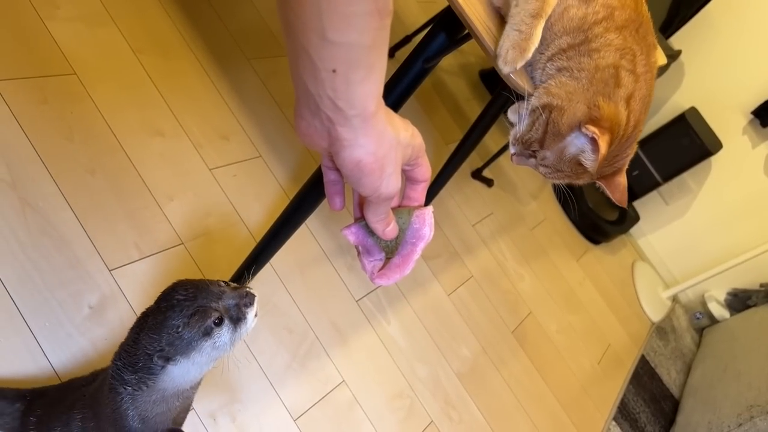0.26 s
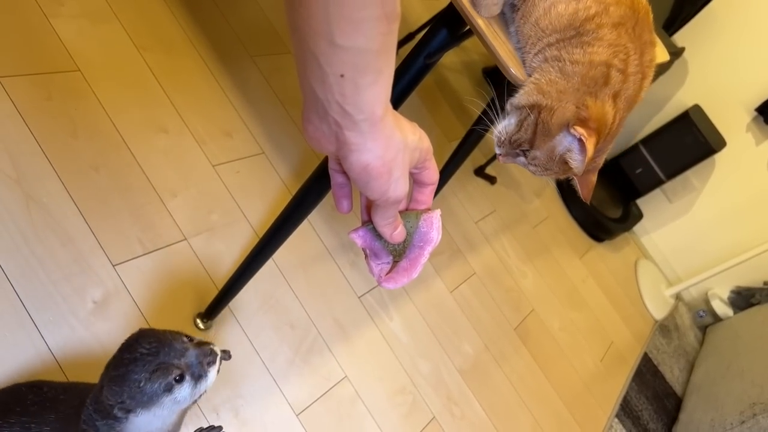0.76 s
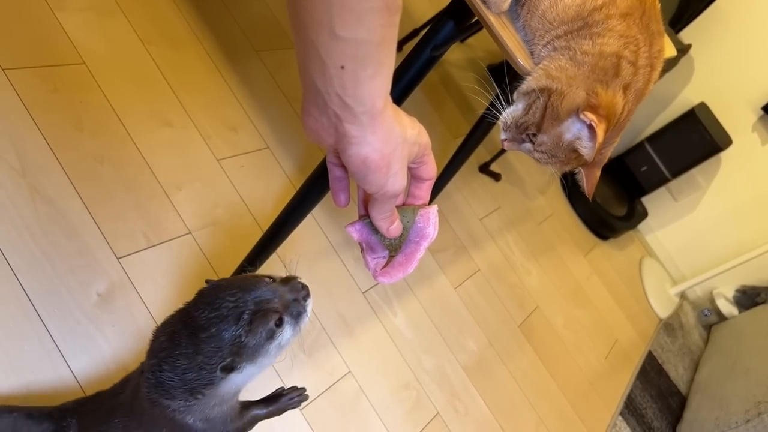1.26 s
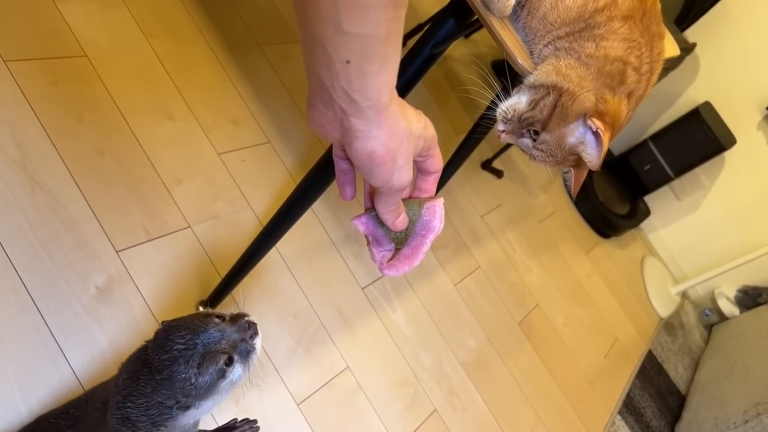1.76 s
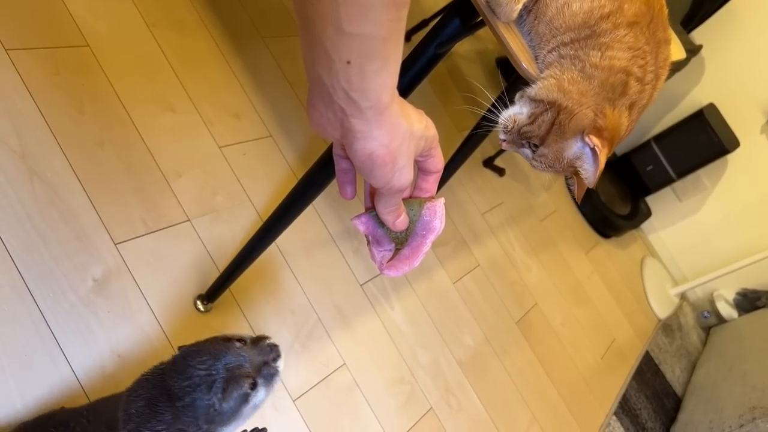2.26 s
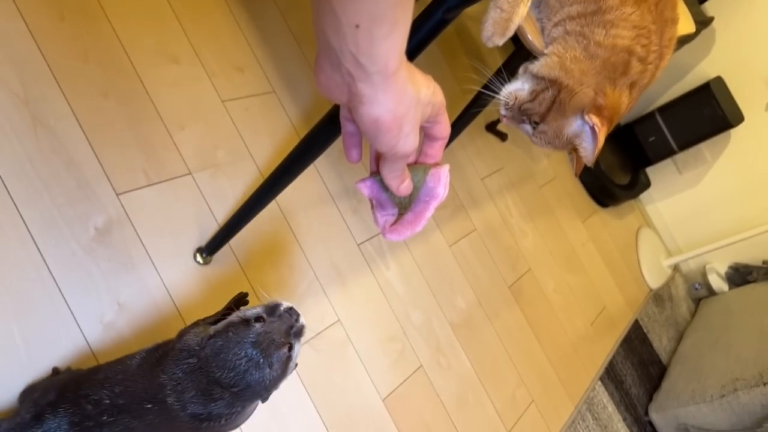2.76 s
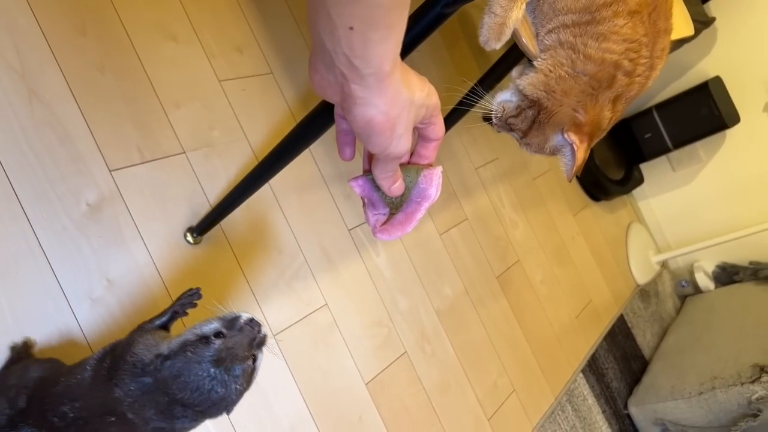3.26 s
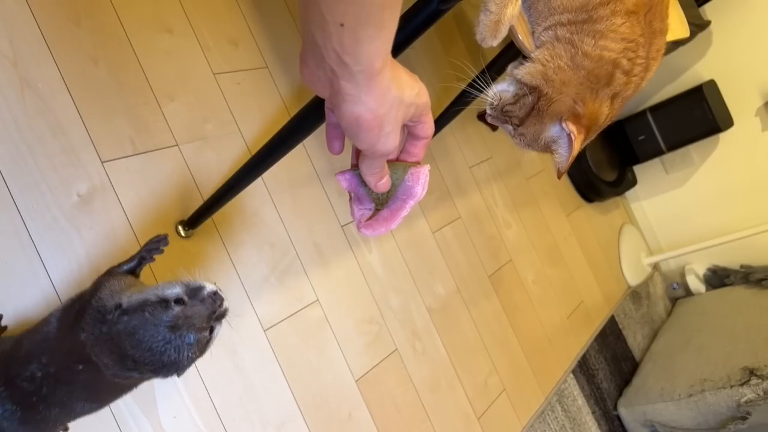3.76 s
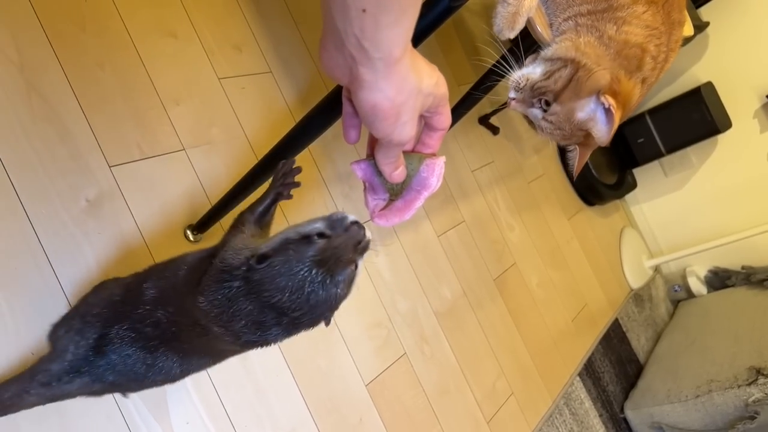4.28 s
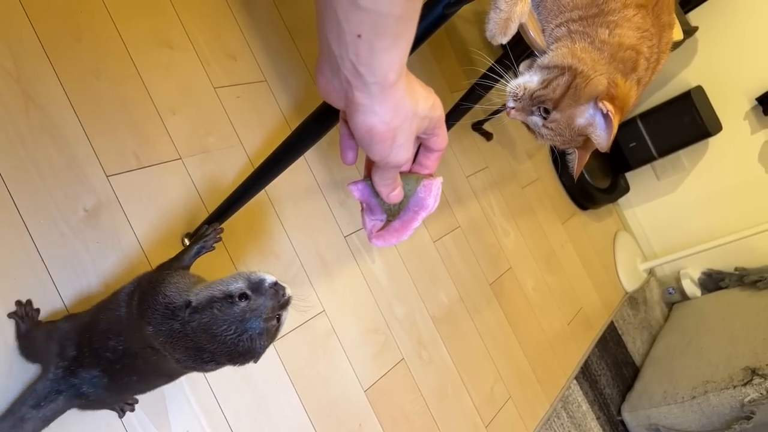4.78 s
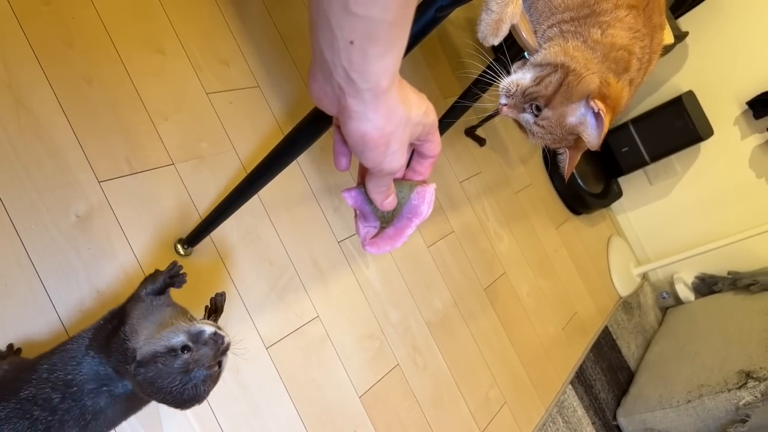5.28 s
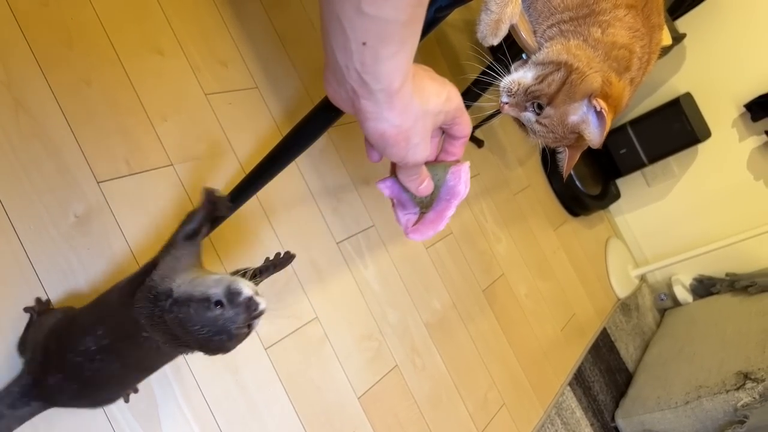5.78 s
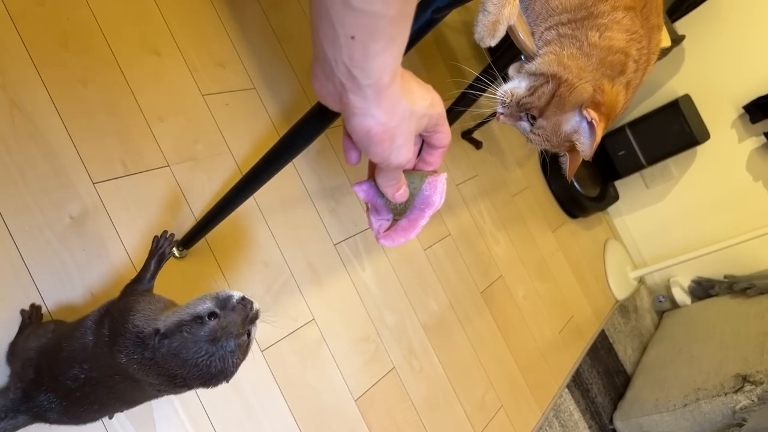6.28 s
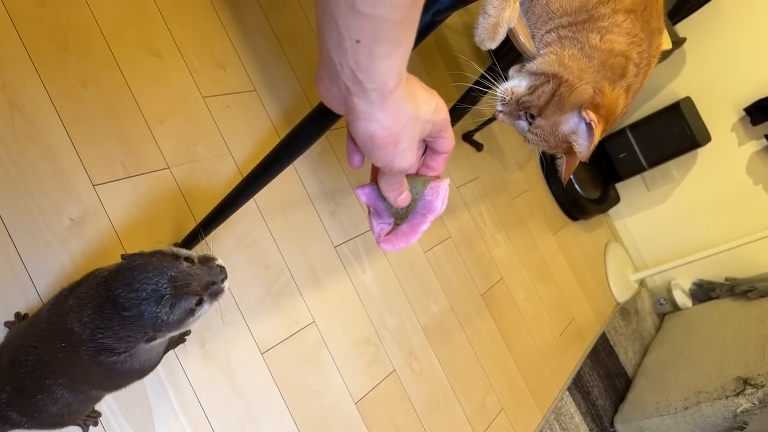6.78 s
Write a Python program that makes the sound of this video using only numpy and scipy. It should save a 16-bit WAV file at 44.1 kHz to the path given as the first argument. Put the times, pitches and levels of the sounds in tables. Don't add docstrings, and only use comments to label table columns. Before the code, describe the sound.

In a quiet room with a wooden floor, a small otter begs near a handheld stereo microphone, slightly left. A long, raspy, nasal squeal starts at once and lasts to 0.6 s. Shorter, eager squeals follow at about 0.8, 1.4, 1.95, 2.55 and 3.2 s, buzzy, bright and breaking in pitch, with faint gasps and sniffs in the gaps. A longer, hoarser call runs from 3.6 to 4.1 s. At 4.4 s a higher yelp jumps up and falls, with a deep paw thump; a gasp follows at 4.7. A long, lower, weary call spans 4.9 to 5.4 s. A short, high squeak at 5.7 comes with the heaviest floor bump. A faint, dull, wavering whine begins at 6.2, then a barely audible last one at 6.75. Faint room air and low motor hum stop abruptly near 6.86; after silence, very soft air from another room rises near 7 s.

```python
import sys
import numpy as np
from scipy import signal
from scipy.fft import rfft, irfft, next_fast_len
from scipy.io import wavfile
from scipy.ndimage import uniform_filter1d

SR = 44100
rng = np.random.default_rng(int(sys.argv[2]) if len(sys.argv) > 2 else 0)


def voltage_ratio(decibels):
    exponent = np.asarray(decibels, float) / 20
    return 10 ** exponent


def log_audio(samples):
    frames = np.atleast_2d(samples).T
    limited = np.clip(frames, -1, 1)
    pcm = np.round(limited * 32767).astype(np.int16)
    wavfile.write(sys.argv[1], SR, pcm)


N = 310023


def evened(x):
    return x / np.sqrt(np.mean(x ** 2) + 1e-20)


def read(points, hz):
    f, value = np.transpose(points)
    return np.interp(np.log(hz + 1), np.log(f + 1), value)


def add(mix, s, sound):
    part = mix[round(s * SR):][:len(sound)]
    part += sound[:len(part)]


def wander(count, knots, length):
    return [evened(signal.resample(row, length)) for row in rng.standard_normal((count, knots))]


def bump(t, s, half_s):
    return np.exp(-((t - s) / half_s) ** 2)


# (first lone click [s], steady beat from [s], last closing [s], first effort [dB], last effort [dB])
CALLS = [(.0055, 0.0087, .608, -24.5, -23.5), (0.8189, 0.826, 1.132, -26, -31),
         (1.3782, 1.3853, 1.751, -25, -27.5), (1.945, 1.9498, 2.32, -28.5, -22.5),
         (2.5543, 2.5628, 2.889, -27.5, -25), (3.166, 3.174, 3.435, -24.5, -27.5),
         (3.6093, 3.6152, 4.1, -26, -35), (4.3716, 4.379, 4.683, -24, -32),
         (4.902, 4.9094, 5.429, -29, -34.5), (5.7257, 5.7302, 5.9, -23.5, -39.5),
         (6.19, 6.211, 6.581, -32.5, -42), (6.741, 6.752, 6.87, -85.5, -82.5)]
# (rise [s], lone click [dB], lips: treble against squeak [dB])
OPENINGS = [(0.041, 3.5, -19.5), (0.033, 5, -18.5), (0.045, 7.5, -20), (0.036, 2, -19.5), (0.032, 7, -19),
            (.037, 3.5, -19), (0.041, 7.5, -20.5), (0.03, -2.5, -22.5), (0.046, 8.5, -19.5),
            (0.028, 1.5, -23.5), (0.14, 18, -28), (0.047, 4.5, 8.5)]
# (hollow under the squeak [dB], ridge above it [dB], top edge [dB])
COLOURS = [(1, 0.5, -0.5), (0, -2.5, 1), (0.5, -2, 4), (0.5, -1, 4.5), (0.5, 0, 2), (1.5, -1, 1),
           (1, 2.5, 2), (0, -1, 1), (1, 1, 0.5), (4, 0.5, 0), (4.5, -6, -7), (0, 0, 0)]
BARED_TEETH_DB = [2.5, -1, 1.5, -1, -2, 2, 0.5, 7, -0.5, 6, 3.5, -12]
# (time [s], mouth [Hz], teeth [Hz], upper resonances [dB])
EARLY_JAW = [
    [(0.02, 2540, 5660, 4.5), (0.15, 2680, 6200, 6.5), (0.25, 2605, 5570, 3.5), (0.46, 2885, 6120, 2),
     (0.61, 2790, 6050, 1)],
    [(0.83, 2560, 6000, 5.5), (0.932, 2730, 6000, 7.5), (1.13, 2570, 6000, -3)],
    [(1.385, 2345, 5550, 0.5), (1.457, 2930, 6100, 3.5), (1.719, 2790, 5800, -2), (1.75, 2620, 5960, -11)],
    [(1.95, 2250, 5700, 3.5), (2.04, 2910, 5850, 2.5), (2.32, 2820, 6100, 0)],
    [(2.56, 2350, 5560, 4.5), (2.732, 2810, 5900, 1), (2.89, 2850, 5900, -2.5)],
    [(3.17, 2450, 5400, 2.5), (3.256, 2730, 5950, 5.5), (3.435, 2510, 5400, 2.5)],
]
# (time [s], mouth [Hz], teeth [Hz], upper resonances [dB])
LATE_JAW = [
    [(3.61, 2200, 5200, -6.5), (3.666, 2620, 5560, 0.5), (3.85, 2620, 5730, -1), (3.992, 2820, 5570, -0.5),
     (4.1, 2545, 5620, -5)],
    [(4.378, 1690, 5510, -3), (4.4, 1854, 5300, 0), (4.438, 2810, 5600, 7.5), (4.498, 2890, 5920, 1.5),
     (4.638, 2550, 5720, -6.5), (4.68, 2400, 6060, 7.5)],
    [(4.905, 2440, 5200, 1.5), (4.989, 2870, 5600, -0.5), (5.249, 2500, 6110, 2), (5.291, 2670, 6020, 1.5),
     (5.43, 2257, 5680, -0.5)],
    [(5.73, 2270, 5400, 3), (5.77, 2250, 5600, -3), (5.89, 2460, 5960, -10)],
    [(6.2, 2070, 5780, 3), (6.258, 2050, 6100, -14), (6.328, 2330, 6350, -20), (6.518, 2150, 6070, -11),
     (6.58, 2240, 5760, -3.5)],
    [(6.75, 2064, 5330, 3), (6.782, 2034, 5240, -2), (6.85, 2410, 5120, 2)],
]


def otter():
    voices, chest = np.zeros((2, N))
    for call, bared_db, jaw, opening, colour in zip(CALLS, BARED_TEETH_DB, EARLY_JAW + LATE_JAW, OPENINGS, COLOURS):
        s, (voice, hum) = squeak(*call, bared_db, jaw, *opening, *colour)
        add(voices, s, voice)
        add(chest, s, hum)
    return voices, chest


# (time [s], depth [0-1], half length [s])
JOLTS = [
    (4.473, 0.6, 0.018),
    (5.801, 0.2, 0.046),
]
STRONG_DB, DULL_PER_DB = -28.5, 2.2


def squeak(first, beat, last, first_db, last_db, bared_db, jaw, rise, click_db, lips_db,
           hollow_db, ridge_db, top_db):
    start, end = first - .002, last + .004
    t = np.arange(start, end, 1 / SR)
    jaw_s, *jaw_paths = np.transpose(jaw)
    peak_hz, teeth_hz, upper_db = [np.interp(t, jaw_s, path) for path in jaw_paths]
    hz, hum_db, slips = notes(t)
    squeak_db, edge_db, lips_db = breath(t, hz, first_db, last_db, rise, lips_db)
    rough = roughness(t, end, slips)
    clicks, puffs, turns = folds(t, first, beat, last, hz, rough, click_db)
    drive = evened(clicks) + (.03 + .65 * rough ** 2) * puffs
    dull_db = DULL_PER_DB * min(first_db - STRONG_DB, 0)

    cavity = mouth(drive, 0.95 * peak_hz, upper_db, dull_db, (hollow_db, hollow_db, 0, ridge_db, top_db))
    hiss = drive + (.45 + .5 * rough) * puffs
    voice = (cavity + throat(drive)) / np.std(cavity) + voltage_ratio(lips_db) * evened(teeth(hiss, teeth_hz, bared_db))
    voice = signal.sosfilt(signal.butter(3, 520, "highpass", fs=SR, output="sos"), voice)
    floor_hz = 70
    shake = sum(d * bump(t, s, half) * np.cos(2 * np.pi * floor_hz * (t - s)) for s, d, half in JOLTS)
    voice = voice * (1 + shake) * np.clip((end - t) / .004, 0, 1)
    chest = np.cos(2 * np.pi * turns) + .06 * np.cos(4 * np.pi * turns)
    hum = np.sqrt(2) * chest * voltage_ratio(hum_db + .5 * edge_db)
    fade = np.clip(np.minimum(t - start, end - t) / .0015, 0, 1)
    return start, np.array([voice * voltage_ratio(squeak_db), hum]) * fade


# (from [s], to [s])
MISSED_BEATS = [
    (2.305, 2.31),
    (6.259, 6.269),
]


def folds(t, first, beat, last, hz, rough, click_db):
    drift_luck, air = rng.standard_normal((2, len(t)))
    drift = evened(uniform_filter1d(uniform_filter1d(drift_luck, size=400), size=400))
    turns = np.cumsum(hz * (1 + (.004 + .035 * rough) * drift)) / SR
    turns = turns - np.interp(beat, t, turns)
    cycle = np.arange(0, int(np.interp(last, t, turns)) + 1)
    place = np.interp(cycle, turns, np.arange(len(t)))
    at = place.astype(int)
    timing_luck, size_luck = rng.standard_normal((2, len(cycle)))
    place = place + .08 * rough[at] * timing_luck * SR / hz[at]
    size = voltage_ratio(7.5 * rough[at] * np.tanh(size_luck))
    for a, b in MISSED_BEATS:
        size = size * (abs(t[0] + place / SR - (a + b) / 2) > (b - a) / 2)
    place = np.append(place, (first - t[0]) * SR)
    size = np.append(size, voltage_ratio(click_db))

    taps = np.clip(place.astype(int)[:, None] + np.arange(-8, 9), 0, len(t) - 1)
    offset = taps - place[:, None]
    clicks = np.zeros(len(t))
    np.add.at(clicks, taps, size[:, None] * np.sinc(offset) * np.cos(np.pi * offset / 18) ** 2)
    puffs = evened((.25 + np.exp(-(turns % 1) / 0.9)) * air)
    return clicks, puffs * np.clip((t - first) / (beat - first), .2, 1), turns


# (start [s], first pitch [Hz], last pitch [Hz], chest hum [dB])
HELD_NOTES = [(0.016, 319, 391.5, -50), (0.042, 376.3, 363, -45), (0.094, 385, 376.7, -45),
              (.186, 299.5, 292.5, -53.5), (.22, 287, 278.4, -47), (0.452, 270.5, 253.3, -48),
              (0.491, 264.9, 251.5, -61), (0.586, 263, 265, -42), (0.818, 317, 300.8, -49),
              (0.843, 404, 340.3, -54), (0.879, 244.7, 271, -44.5), (1.083, 323, 298.7, -59),
              (1.384, 293.2, 295.2, -54), (1.445, 395.8, 281, -49), (1.518, 272.7, 273.6, -52),
              (1.631, 290, 263.5, -46.5), (1.716, 300.3, 294.8, -48), (1.948, 332, 385.8, -50),
              (1.985, 385.8, 359.8, -46.5), (2.012, 277, 296.2, -50.5), (2.047, 389.6, 384.3, -44),
              (2.078, 381, 292.8, -53), (2.12, 285.4, 269.7, -47), (2.222, 281.6, 289, -47),
              (2.299, 328, 315, -45.5), (2.556, 375.2, 360.8, -50.5), (2.616, 342.7, 394, -53),
              (2.641, 279.3, 270, -52), (2.768, 315, 273.3, -48), (2.796, 268.3, 252.7, -53.5),
              (3.168, 308.5, 324, -52), (3.194, 384.2, 362.4, -49), (3.223, 342, 324, -54),
               (3.245, 373.3, 361.6, -47), (3.395, 321.6, 324.8, -54.5), (3.613, 330, 312.7, -52.5),
               (3.631, 313.4, 339.7, -54.5), (3.644, 359, 378.8, -47.5), (3.726, 312.7, 287, -48),
               (3.752, 246.1, 256.9, -51), (3.852, 253.3, 244, -42), (3.937, 247.9, 248.9, -36.5),
               (4.032, 251.5, 268.7, -51.5), (4.369, 467, 433, -42.5), (4.383, 486.7, 594, -81.5),
               (4.411, 345, 318, -53.5), (4.448, 421.3, 451.8, -51.5), (4.51, 366.6, 287, -52.5),
               (4.533, 311.1, 287, -50.5), (4.899, 294, 311, -54), (4.927, 275.7, 255.3, -60.5),
               (5.001, 265, 247.7, -44.5), (5.125, 240, 236, -44.5), (5.199, 233.1, 235.4, -48.5),
               (5.291, 228.8, 253.7, -43), (5.399, 321, 319.8, -59), (5.723, 448.6, 464.4, -42.5),
               (5.756, 408.3, 370, -37.5), (5.772, 382, 455.5, -42), (5.793, 433, 403.3, -51.5),
               (5.826, 384.6, 342, -50.5),
              (6.188, 360, 330.7, -57),
    (6.225, 315, 279.6, -55),
    (6.263, 277, 331, -60),
    (6.322, 331, 277.4, -52),
    (6.355, 267.4, 334.5, -58),
    (6.395, 317.3, 305, -62.5),
    (6.48, 316.6, 275.3, -53.5),
    (6.529, 292, 306.5, -55.5),
    (6.749, 328, 294.5, -49.5),
    (6.791, 304, 305, -43.5),
]
SLIP_S, SWELL_S = 0.00311, 0.01
SLIP_ROUGH = .2


def notes(t):
    rows = [row for row in HELD_NOTES if t[0] - .01 <= row[0] < t[-1]]
    s, first_hz, last_hz, hum_db = np.transpose(rows)
    ends = np.append(s[1:] - SLIP_S, t[-1])
    hz = np.interp(t, np.ravel([s, ends], "F"), np.ravel([first_hz, last_hz], "F"))
    held_db = hum_db[np.maximum(np.searchsorted(s, t) - 1, 0)]
    hum = uniform_filter1d(held_db, size=max(round(SWELL_S * SR), 1))
    big = s[1:][abs(np.log(first_hz[1:] / last_hz[:-1])) > .12]
    slips = SLIP_ROUGH * (abs(t[:, None] - np.append(big, -1)) < .008).any(1)
    return hz, hum, slips


# (from [s], to [s], roughness [0-1])
HOARSE_SPELLS = [(.145, .19, .42), (.35, .41, .19), (.81, .89, .55), (.89, 1.0, .3), (1.37, 1.4, .7),
                 (1.435, 1.62, .32), (1.94, 1.966, .45), (2.01, 2.12, .3), (2.12, 2.22, .15),
                 (2.55, 2.575, .6), (2.725, 2.79, .22), (3.16, 3.185, .4), (3.28, 3.4, .4),
                 (3.6, 3.625, .4), (3.7, 3.82, .45), (3.82, 4.02, .27), (4.412, 4.44, .45),
                 (4.44, 4.495, .13), (4.495, 4.53, .25), (4.89, 4.92, .8), (5.0, 5.24, .33),
                 (5.3, 5.36, .25), (5.757, 5.775, .3), (5.79, 5.89, .1), (6.18, 6.25, .12), (2.3, 2.32, .3),
                 (6.35, 6.385, .12), (6.42, 6.5, .15), (6.5, 6.57, .26), (4.92, 5.0, .1), (1.62, 1.75, .1),
                 (1.4, 1.435, .08), (2.845, 2.89, .4)]
SPENT_S, SPENT_ROUGH = .018, .28


def roughness(t, end, slips):
    hoarse = sum(r * (t > a) * (t <= b) for a, b, r in HOARSE_SPELLS)
    spent = SPENT_ROUGH * (t > end - SPENT_S)
    return .04 + uniform_filter1d(np.max([hoarse, slips, spent], axis=0), size=200)


# (time [s], level [dB], half length [s])
BREATH_PUSHES = [(0.094, 3, 0.028), (0.22, -2.5, 0.1), (0.474, 0.5, 0.069), (1.451, 2, 0.0087),
                 (0.85, 1, 0.014), (2.59, 2, 0.014), (1.677, 2.5, 0.023), (1.992, 5, 0.015),
                 (2.266, -1.5, 0.041), (2.628, 3.5, 0.013), (3.209, 3, 0.012), (3.259, 2, 0.012),
                 (3.69, 3, 0.0051), (3.364, 1, 0.02), (4.487, -1, 0.0048), (3.648, 2.5, .03),
                 (3.751, 0, 0.017), (3.956, 7.5, 0.16), (4.437, -2, 0.01), (4.444, -3, 0.012),
                 (4.461, 4.5, 0.025), (2.06, 3, 0.025), (2.285, 2.5, 0.011), (5.75, 1.5, 0.0097),
                 (5.794, 3.5, 0.0077), (0.31, -1, 0.037), (0.575, -1.5, 0.032), (0.97, 1.5, 0.048),
                 (1.096, -1, 0.013), (2.827, -1, 0.035), (3.389, 0, 0.024), (4.613, 0.5, 0.05),
                 (6.297, -3, 0.011), (6.561, 4, 0.018), (4.951, 0.5, 0.015), (5.276, 4.5, 0.084),
                 (5.798, 2, 0.051), (6.199, -29, 0.008), (6.324, 4, 0.018), (6.432, 2.5, 0.055)]
RISE_DB, FALL_S, FALL_DB = -24, 0.042, -5
LIPS_PER_DB, LIPS_DB_PER_OCTAVE, LIPS_SHUT_DB = 1, 11, -2.5


def breath(t, hz, first_db, last_db, rise, lips_db):
    since, gone = t - t[0], (t - t[0]) / (t[-1] - t[0])
    push = sum(db * bump(t, s, half) for s, db, half in BREATH_PUSHES)
    edge_db = RISE_DB * np.clip(1 - since / rise, 0, 1) ** 2
    edge_db = edge_db + FALL_DB * np.clip(1 - (t[-1] - t) / FALL_S, 0, 1)
    squeak_db = first_db + (last_db - first_db) * gone + push + edge_db
    rise_octaves = np.clip(np.log2(uniform_filter1d(hz, size=900) / 280), -.3, .45)
    lips = lips_db + LIPS_PER_DB * push + LIPS_DB_PER_OCTAVE * rise_octaves
    return squeak_db, edge_db, lips + LIPS_SHUT_DB * np.exp(-(since / rise) ** 2 * 2)


def resonate(x, hz, width):
    turn = np.exp(2j * np.pi * np.cumsum(hz * np.ones(len(x))) / SR)
    r = np.exp(-np.pi * width / SR)
    once = signal.lfilter([1 - r], [1, -r], x / turn)
    return 2 * (turn * signal.lfilter([1 - r], [1, -r], once)).real


# (factor on mouth frequency [ratio], width [Hz], level [dB])
MOUTH_MODES = [(.68, 643, -1), (.84, 705, 7), (1.03, 865, 14.5), (1.27, 459, 10), (1.5, 829, 1)]
SWAY_DB, DULL_EDGE_HZ_PER_DB = 1.5, 40


def mouth(drive, mouth_hz, upper_db, dull_db, colour_db):
    steady_hz = np.sqrt(mouth_hz * 2700)
    sway = wander(len(MOUTH_MODES), 16, len(drive))
    out = 0
    for n, (factor, width, db) in enumerate(MOUTH_MODES):
        level_db = db + colour_db[n]
        if n > 2:
            level_db = level_db + dull_db + upper_db
        if n != 2:
            level_db = level_db + SWAY_DB * sway[n]
        hz = factor * (mouth_hz if n < 3 else steady_hz)
        out = out + (-1) ** n * voltage_ratio(level_db) * resonate(drive, hz, width)
    edge_hz = 4044.0 + DULL_EDGE_HZ_PER_DB * max(dull_db, -25)
    return signal.sosfilt(signal.butter(5, edge_hz, fs=SR, output="sos"), out)


# (frequency [Hz], width [Hz], level [dB])
THROAT_MODES = [(1067, 660, -8.5), (1518, 1110, -1)]


def throat(drive):
    out = sum(voltage_ratio(db) * resonate(drive, hz, width) for hz, width, db in THROAT_MODES)
    return signal.sosfilt(signal.butter(2, 2400, fs=SR, output="sos"), out)


# (frequency [Hz], width [Hz], level [dB])
TEETH_MODES = [(5700, 1300, 10), (6760, 530, -5), (7890, 440, -2), (10980, 2500, -11), (14300, 2400, -28.5)]


def teeth(hiss, teeth_hz, bared_db):
    out = 0
    for (f, width, db), v in zip(TEETH_MODES, wander(len(TEETH_MODES), 14, len(hiss))):
        hz = f * (1 + .01 * v)
        level_db = db + 2.4 * v
        if f < 7000:
            hz = hz * teeth_hz / 5800
        if f > 9000:
            level_db = level_db + bared_db + 3 * v
        out = out + voltage_ratio(level_db) * resonate(hiss, hz, max(width, 600))
    return signal.sosfilt(signal.butter(3, 4900, "highpass", fs=SR, output="sos"), out)


# (time [s], boom [dB], knock [dB])
LANDINGS = [(0.56, -38.5, -66.5), (1.37, -49, -76), (2.146, -40, -72), (2.695, -45, -77), (3.349, -46, -57),
            (3.9, -37.5, -61.5), (4.168, -50, -79), (4.423, -21.5, -50.5), (4.799, -42.5, -76),
            (4.974, -35, -65), (5.752, -19, -47), (5.768, -21, -34), (6.404, -40.5, -68)]
# (frequency [Hz], level [dB], t60 [s])
FLOOR_MODES = [(70.7, -4, 0.4), (58.3, -18, 0.45)]
# (frequency [Hz], level [dB], t60 [s])
BOARD_MODES = [(122, 6.5, 0.23), (206, 7.5, 0.25), (330, 7.5, 0.1), (553, 2, 0.092)]


def paws():
    t, out = np.arange(SR // 2) / SR, np.zeros(N)
    for s, boom_db, knock_db in LANDINGS:
        for level_db, modes, rise_s in ((boom_db, FLOOR_MODES, .008), (knock_db, BOARD_MODES, .001)):
            ring = sum(voltage_ratio(db - 60 * t / t60) * np.sin(2 * np.pi * hz * t) for hz, db, t60 in modes)
            add(out, max(s - .01, 0), voltage_ratio(level_db) * ring * (1 - np.exp(-t / rise_s)))
    return out


# (time [s], level [dB])
GASP_TIMES = [
    (.66, -71.5),
    (1.18, -86),
    (1.798, -76.5),
    (2.37, -71.5),
    (2.929, -63.5),
    (3.47, -69.5),
    (4.13, -64.5),
    (4.711, -56),
    (5.46, -60),
]
# (time [s], level [dB], half length [s])
HISS_SWELLS = [(0.7, -74.5, 0.033), (1.347, -61.5, 0.0037), (1.5, -67.5, 0.015), (4.4, -66.5, 0.064),
               (4.2, -70.5, 0.068), (5.72, -66.5, 0.046), (4.402, -63.5, .008), (1.975, -66, 0.0066),
               (2.575, -67.5, .006), (6.618, -59, 0.027), (6.811, -78, 0.14)]
# (frequency [Hz], level [dB per Hz])
GASP_HISS = [(1500, -29.5), (3500, -3.5), (5000, -11.5), (8000, -10), (11500, -7.5), (16000, -18.5)]
GASP_DB_PER_S = -170


def gasps():
    t, level = np.arange(N) / SR, np.zeros(N)
    for s, db in GASP_TIMES:
        level += np.clip((t - s) / .016 + 1, 0, 1) * voltage_ratio(db + GASP_DB_PER_S * np.maximum(t - s, 0))
    for s, db, half in HISS_SWELLS:
        level += voltage_ratio(db) * bump(t, s, half)
    return level * noise(GASP_HISS, patchy_db=2.5)


# (frequency [Hz], left-right likeness [-1 to 1])
LIKENESS = [(60, 0.81), (170, 0.63), (510, -0.036), (1470, -0.69), (4250, 0.44), (12300, -0.39)]


def noise(spectrum, patchy_db):
    hz = np.fft.rfftfreq(1024, 1 / SR)
    a, b, c, d, patches = rng.standard_normal((N // 256 + 9, 513, 5)).T
    patches = evened(uniform_filter1d(uniform_filter1d(patches, size=10, axis=0), size=12, axis=1))
    same = np.clip(read(LIKENESS, hz), -1, 1)[:, None]
    left = a + 1j * b
    right = same * left + np.sqrt(1 - same ** 2) * (c + 1j * d)
    z = np.array([left, right]) * voltage_ratio(read(spectrum, hz)[:, None] + patchy_db * patches)
    return evened(signal.istft(z, nperseg=1024, noverlap=768)[1][:, 512:][:, :N])


# (frequency [Hz], level [dB])
DIFFERENCE_DB = [(60, -30), (200, -21), (600, -1), (1500, -8.5), (2500, -4), (5600, -4.5), (10500, -5),
                 (15000, 0)]
# (frequency [Hz], phase [radians])
DIFFERENCE_LEAD = [(100, -2.5), (600, 1.5), (1300, 1.5), (2800, -1), (5600, -0.65), (12000, -1)]
# (delay [s], sum [dB], difference [dB])
EARLY_ECHOES = [(.0011, -20, -15), (.0027, -20.5, -18.5), (.0063, -11.5, -3.5), (0.012, -13, -4.5)]


def ports(x):
    size = next_fast_len(N + 4096)
    hz = np.fft.rfftfreq(size, 1 / SR)
    both, apart = 1 + sum(voltage_ratio(np.array([[sum_db], [diff_db]])) * np.exp(-2j * np.pi * hz * s)
                          for s, sum_db, diff_db in EARLY_ECHOES)
    apart = apart * voltage_ratio(read(DIFFERENCE_DB, hz)) * np.exp(1j * read(DIFFERENCE_LEAD, hz))
    return irfft(rfft(x, size) * np.array([both + apart, both - apart]), size)[:, :N]


# (frequency [Hz], t60 [s])
ROOM_T60 = [(100, 0.5), (500, 0.37), (2500, 0.3), (6000, 0.34), (12000, 0.26)]


def room(x):
    taps = np.zeros((2, SR))
    at = np.arange(500, SR - 20, 20) + rng.integers(0, 20, (2, (SR - 501) // 20))
    np.put_along_axis(taps, at, rng.choice([-1., 1.], at.shape), 1)
    hz, t, z = signal.stft(taps, SR, nperseg=256)
    tail = signal.istft(z * voltage_ratio(-60 * t / read(ROOM_T60, hz)[:, None]), SR, nperseg=256)[1]
    return signal.fftconvolve(x[None], tail / np.linalg.norm(tail[0]), axes=1)[:, :N]


# (frequency [Hz], level [dB per Hz])
ROOM_AIR = [(15, -40.5), (25, -21), (85, -5), (147, -6.5), (230, -4), (306, -9), (477, -6.5), (991, -18.5),
            (2600, -25), (3850, -32), (12800, -55), (16600, -99.5), (22000, -120)]


def room_air():
    return voltage_ratio(-56) * noise(ROOM_AIR, patchy_db=1.3)


# (frequency [Hz], level [dB])
MOTOR_LINES = [(100, -65.5), (200, -75.5), (248, -78.5)]


def motor():
    t = np.arange(N) / SR
    return sum(np.sqrt(2) * voltage_ratio(db + 3.6 * w) * np.sin(2 * np.pi * hz * t + 0.8 * w)
               for (hz, db), w in zip(MOTOR_LINES, wander(len(MOTOR_LINES), 60, N)))


# (time [s], level [dB])
NEXT_FADE = [
    (6.93, -100),
    (6.96, -82),
    (6.99, -71),
    (7.03, -65),
]
# (frequency [Hz], level [dB per Hz])
NEXT_ROOM_AIR = [(40, -6), (200, -4), (900, -6), (2500, -14), (6000, -22), (13000, -28), (16600, -60)]


def next_room():
    t = np.arange(N) / SR
    s, db = np.transpose(NEXT_FADE)
    return voltage_ratio(np.interp(t, s, db)) * (t > s[0]) * noise(NEXT_ROOM_AIR, patchy_db=3.0)


# (time [s], left minus right [dB])
OTTER_PAN = [(0, -5), (2.2, -5), (3.2, -5.5), (5.2, -7.5), (7.0, -6)]
CUT_S, ROOM_DB = 6.862, -8
CHEST_WET_DB = 3.5


def scene():
    voices, chest = otter()
    t = np.arange(N) / SR
    turn = voltage_ratio(np.interp(t, *np.transpose(OTTER_PAN)) / 2)
    first = voltage_ratio(-2.0) * ports(voices + chest) * np.array([turn, 1 / turn])
    first = first + voltage_ratio(ROOM_DB) * room(voices + voltage_ratio(CHEST_WET_DB) * chest)
    first = first + paws() * voltage_ratio(np.array([[-.6], [.6]])) + gasps()
    first = first + room_air() + motor()
    return first * np.clip((CUT_S - t) / 0.0025, 0, 1) + next_room()


# (frequency [Hz], level under the loudest band [dB])
MASK_LIMIT = [(4000, -70), (4900, -46), (5500, -60), (7500, -47), (8300, -55), (9400, -47), (10500, -53),
              (11500, -50), (12500, -52)]


def masked(x):
    hz, _, z = signal.stft(x, SR, nperseg=1024, noverlap=768)
    power = uniform_filter1d(uniform_filter1d(abs(z) ** 2, size=7, axis=0), size=6, axis=1)
    whim = rng.standard_normal(z.shape)
    whim = evened(uniform_filter1d(uniform_filter1d(whim, size=5, axis=0), size=20, axis=1))
    limit = power[hz > 1000].max(0) * voltage_ratio(read(MASK_LIMIT, hz)[:, None] + 4 * whim) ** 2
    keep = (power > limit) | (hz[:, None] < 4000)
    return signal.istft(z * keep, SR, nperseg=1024, noverlap=768)[1][:N]


def low_pass(x):
    return signal.sosfilt(signal.butter(12, 15800, fs=SR, output="sos"), x)


# (frequency [Hz], level [dB])
SUM_DB = [(100, 7.5), (4400, 1), (4600, 2), (4800, -0.5), (5000, 3.5), (5300, 1), (9000, 0.5),
          (11200, -8.5), (12300, -16), (13000, -47.5), (22000, -60.5)]
# (frequency [Hz], level [dB])
APART_DB = [(100, 0), (6000, 0), (6400, -40), (9800, -30), (10500, 0)]


def record(dry):
    both, apart = (dry[0] + dry[1]) / 2, (dry[0] - dry[1]) / 2
    hz = np.fft.rfftfreq(N, 1 / SR)
    gain = voltage_ratio(np.array([read(SUM_DB, hz), read(APART_DB, hz)]))
    both, apart = irfft(rfft([both, apart]) * gain, N)
    mix = masked(both) + np.array([apart, -apart])
    mix = signal.sosfilt(signal.butter(3, 42, "highpass", fs=SR, output="sos"), mix)
    return low_pass(mix)


dry = scene()
out = record(dry)
log_audio(out)
```